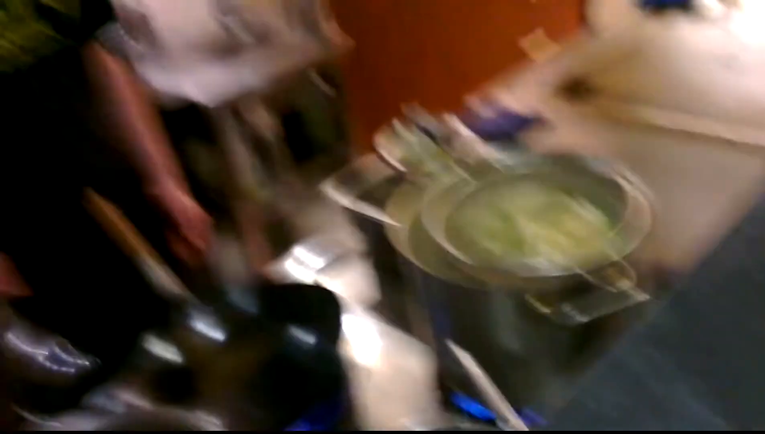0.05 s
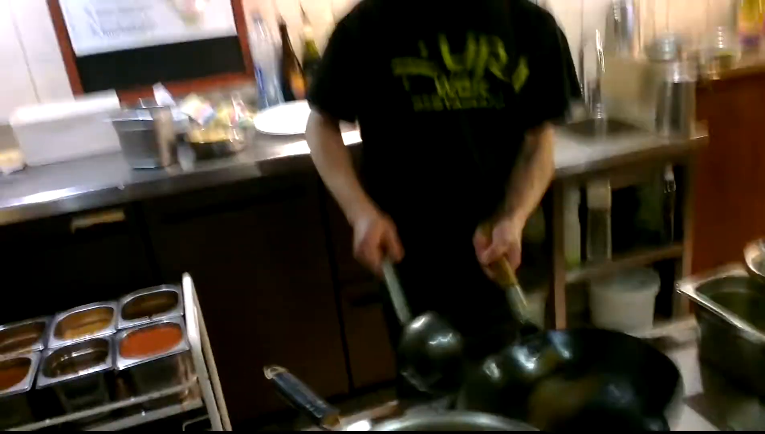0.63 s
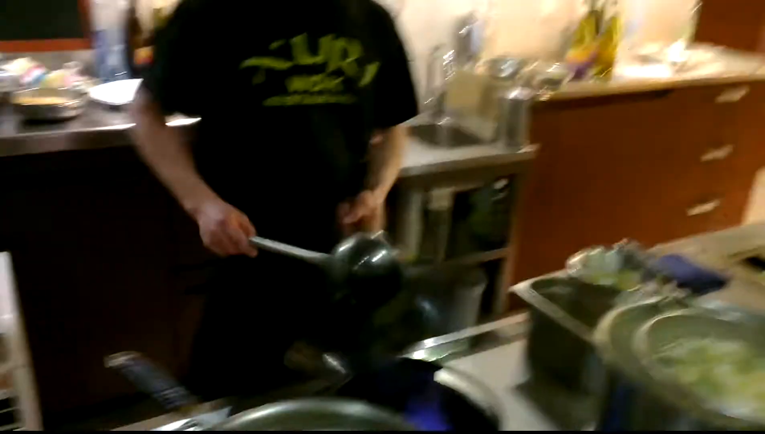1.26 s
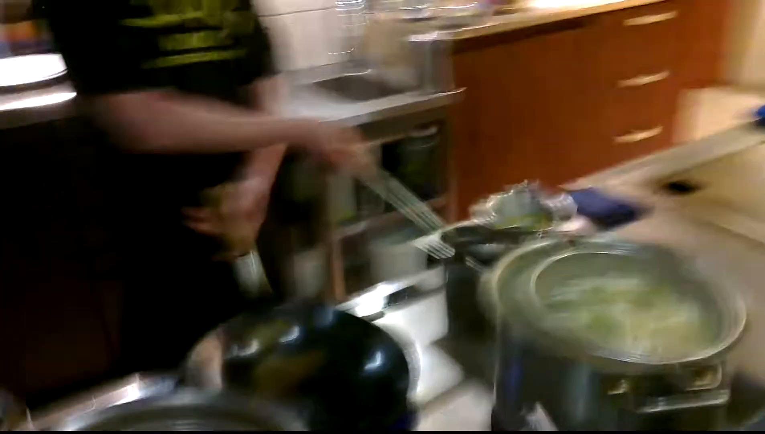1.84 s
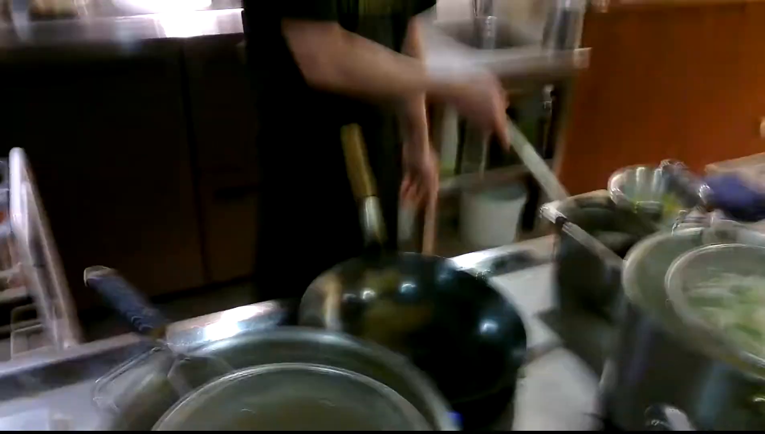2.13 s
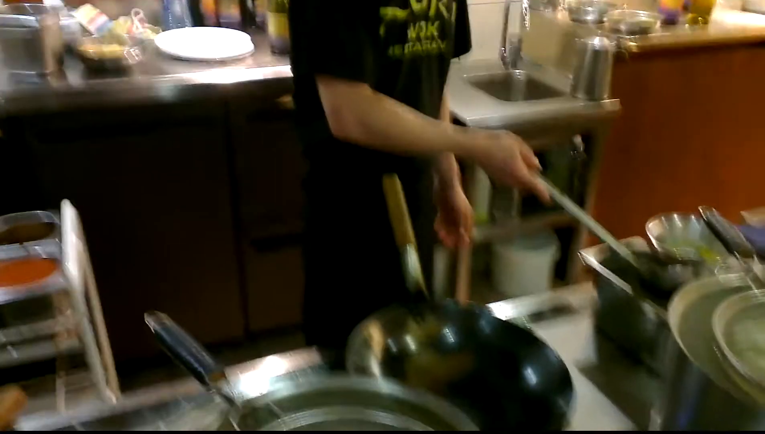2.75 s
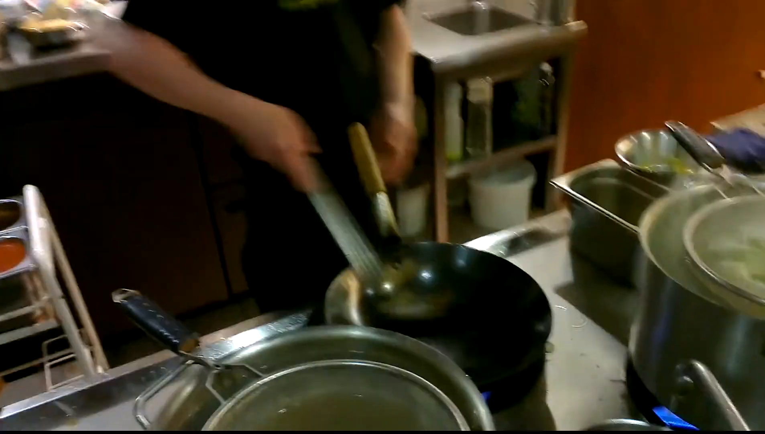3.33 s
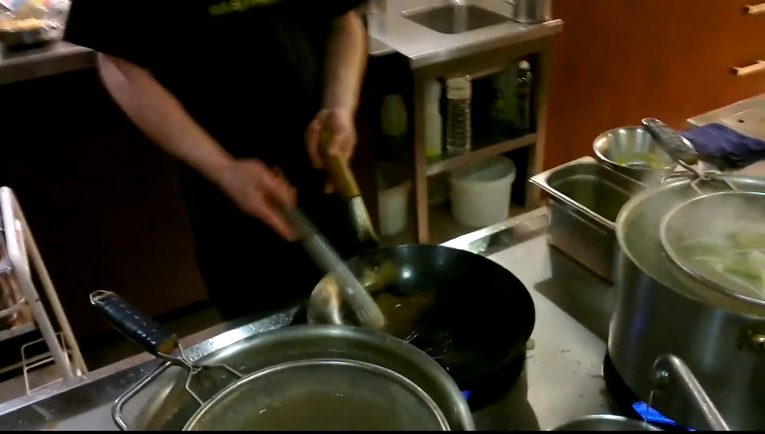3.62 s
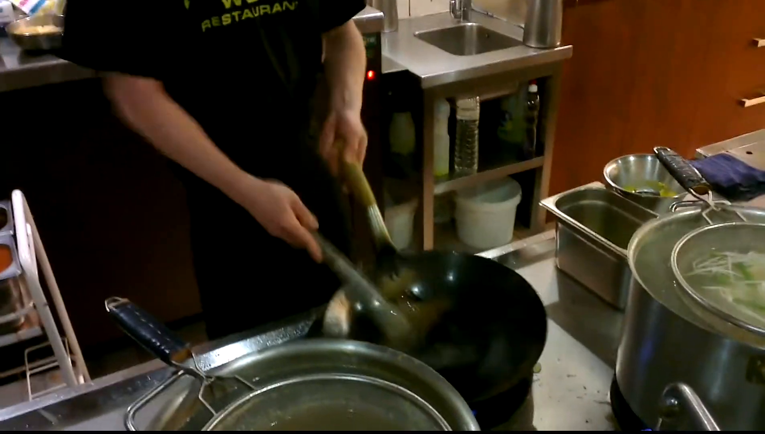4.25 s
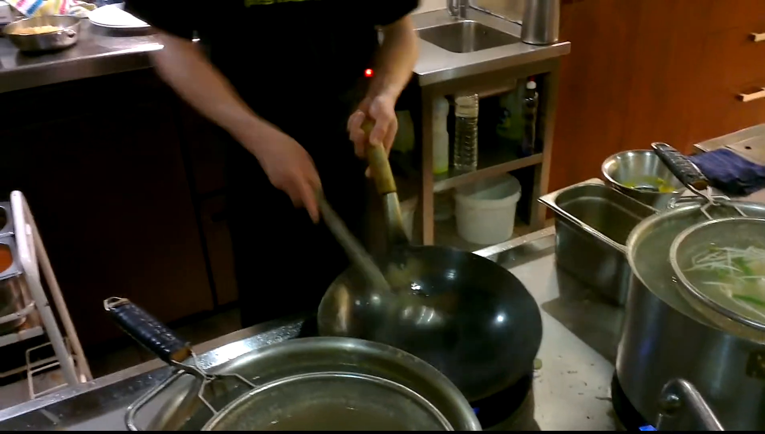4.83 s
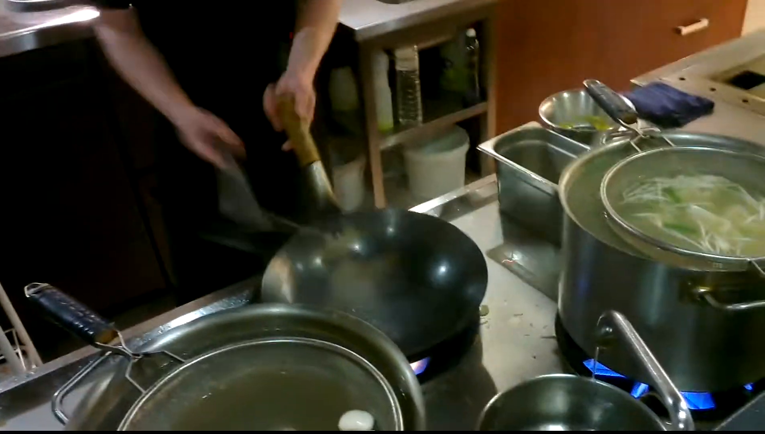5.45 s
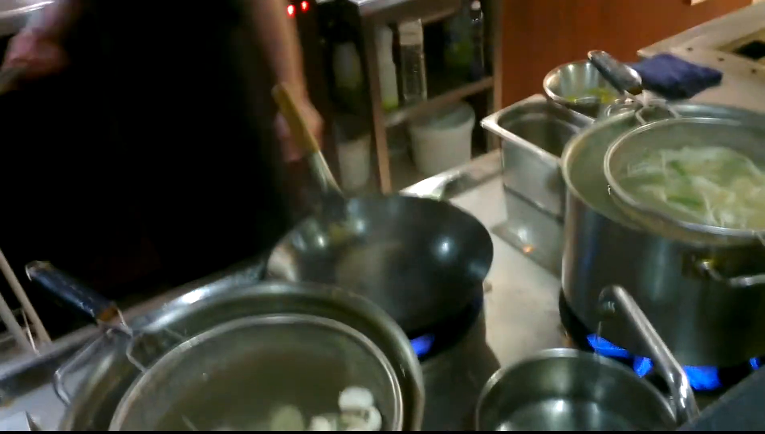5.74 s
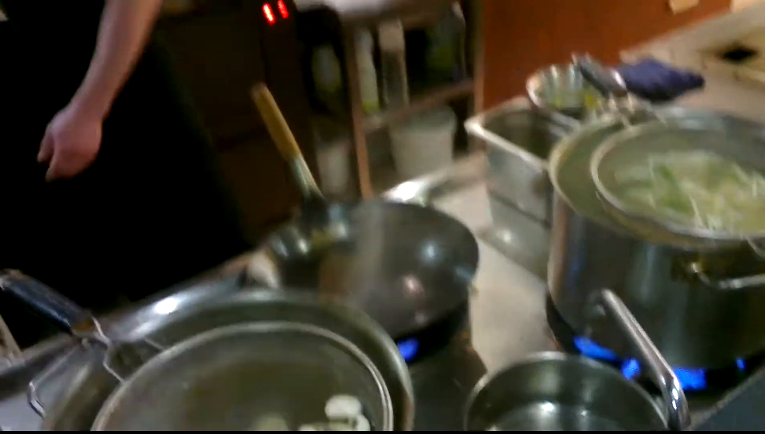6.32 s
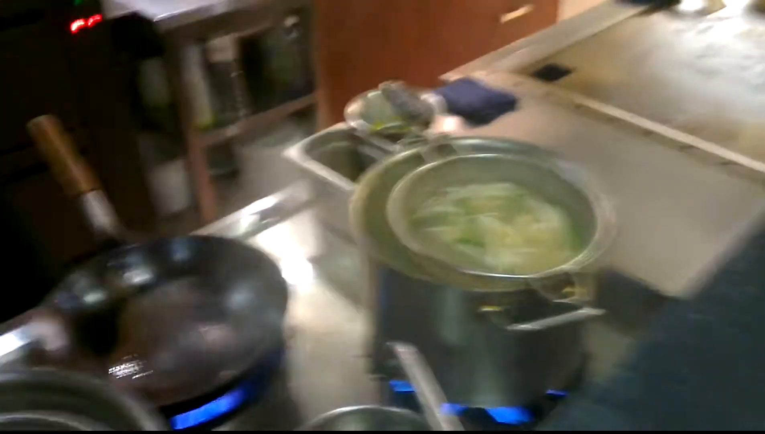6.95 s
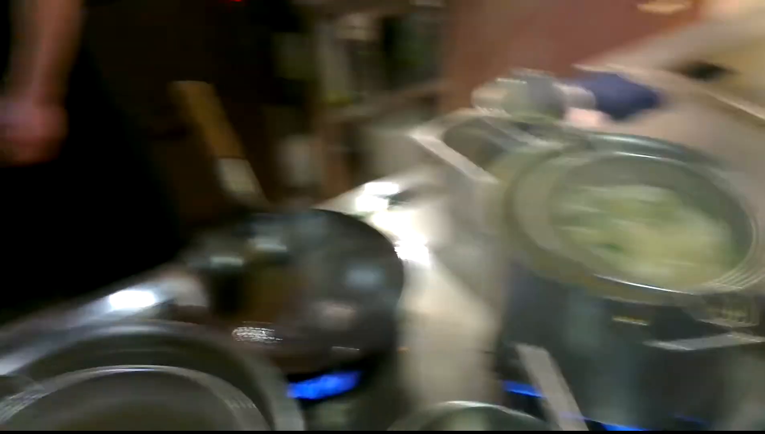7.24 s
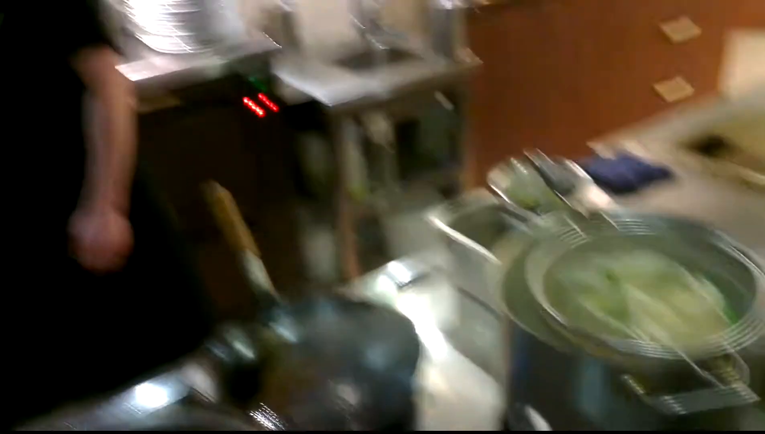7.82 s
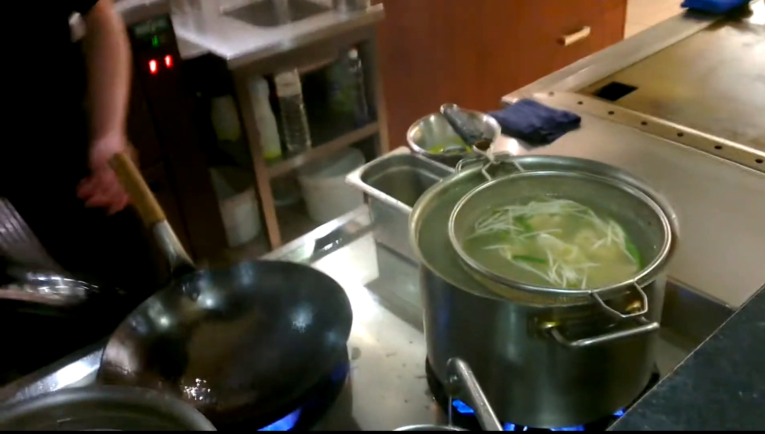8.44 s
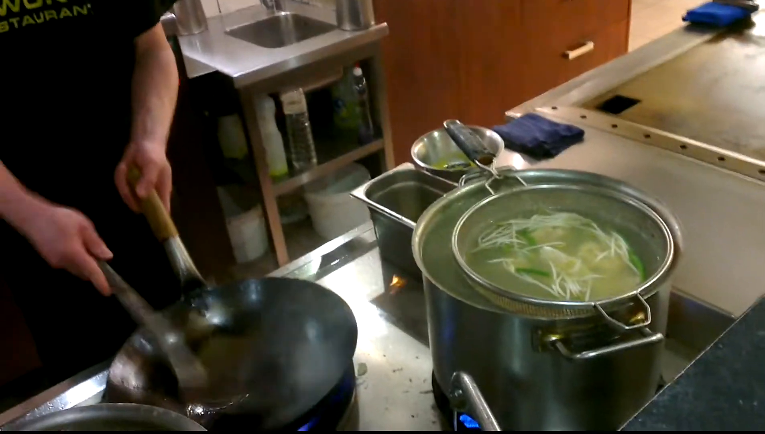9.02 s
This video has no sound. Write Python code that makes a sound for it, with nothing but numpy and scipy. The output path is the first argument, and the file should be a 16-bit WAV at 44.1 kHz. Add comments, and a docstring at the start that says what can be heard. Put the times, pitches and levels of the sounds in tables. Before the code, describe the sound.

A steel wok is struck by a ladle and clatters onto the stove over a roaring gas flame and a hissing hood. After a few seconds, frying starts and swells into a steamy burst, and the flame briefly drops. The ladle clangs and scrapes, oil keeps crackling and popping, and a last clang sets off another burst of sizzling. The microphone is close, in a tiled kitchen.

```python
"""A tiled kitchen, close to the stove, the microphone facing a steel wok on a roaring gas burner. Air hisses
through the hood behind it. The ladle clangs and scrapes, and the wok rattles on its iron ring. Then food meets
the hot oil: bubbles burst, water flashes to steam, fat spits and the sizzle flares twice. The background dips
briefly after each flare. Two short delays widen the sound to stereo."""
import sys
import numpy as np
from scipy import signal
from scipy.fft import rfft, irfft, next_fast_len
from scipy.io import wavfile
from scipy.ndimage import uniform_filter1d, map_coordinates

SR = 44100
rng = np.random.default_rng(int(sys.argv[2]) if len(sys.argv) > 2 else 0)


def transcribe(signal):
    """Save signal, clipped to [-1, 1], as a 16-bit WAV file at the path in sys.argv[1]."""
    frames = np.atleast_2d(signal).T
    limited = np.clip(frames, -1, 1)
    pcm = np.round(limited * 32767).astype(np.int16)
    wavfile.write(sys.argv[1], SR, pcm)


N = 404397

# decay of the kitchen: f/Hz, t60/s
ROOM_DECAY = [(200, 1), (2000, 0.26), (10000, 0.12)]
# level shared by burner and hood, sinking after each flare: t/s, level/dB
ROAR_LEVEL = [(0, -26), (1.65, -26.5), (2.1, -27), (3.3, -27), (4.3, -27), (4.505, -32.5), (4.535, -44.5),
              (4.9, -40.5), (5.08, -34.5), (5.4, -35), (5.53, -26.5), (5.85, -29), (7.3, -29), (8.7, -26.5),
              (8.82, -34), (9.17, -46)]
# spectra of the background: f/Hz, relative level/dB
HOOD_SPECTRUM = [(1060, -11.5), (1800, 0.5), (2770, 1), (3640, 1), (4530, 1), (8830, 0), (9950, 1.5),
                 (14200, -23.5), (15600, -61), (16000, -75)]
FLAME_SPECTRUM = [(40, -58), (60, -60), (115, -16.5), (210, -6.5), (255, -7), (336, -0.5), (421, -4.5),
                  (536, -14.5), (660, -10), (1110, -15), (1710, -18.5), (2100, -27.5), (3200, -54),
                  (5500, -90)]
# resonances of the hollow under the wok: f/Hz, width/Hz, relative level/dB
HOLLOW_MODES = [(212, 22, -1.5), (332, 55.6, 1), (390, 66, -6), (541.5, 36, -7), (606, 53, -11),
                (744, 72, -17), (1047, 31, -14.5), (1886, 27, -14.5)]
# two higher resonances of the flame: f/Hz, width/Hz
FLAME_RESONANCES = [(510, 135), (725, 207)]
# their changing strength against the roar level: t/s, lower note/dB, upper note/dB
FLAME_NOTE_LEVELS = [(0, -8, -27), (.65, -6.5, -19), (1, -14.5, -13), (3, -10, -16), (5.6, -13.5, -13),
                     (6.7, -15, -8), (7.2, -16, -17), (8, -9, -24), (9.17, -9.5, -20)]

# the ladle drags over the steel: t/s, hold/s, f/Hz, level/dB
LADLE_SCRAPES = [(3.524, 0.04, 2880, -36.5), (5.145, 0.011, 3900, -27)]
# the wok lands on its iron ring: t/s, level/dB, dullness/(dB per octave)
WOK_LANDINGS = [(1.403, -22.5, 1), (1.572, -36, 5), (5.572, -29, 11)]
# steel strikes steel: t/s, chatter/s, spot (0 outside the wok, 1 inside),
# wok modes/dB, sheet/dB, rim/dB, iron ring/dB, ladle edge/dB, ladle modes/dB, clack/dB
METAL_BLOWS = [(.38, 0.013, 0, -48, -45, -39, -28, -52, -55, -45),
               (.948, 0.0083, 0, -22, -15, -40, -42, -19, -34, -14.5),
               (.956, 0.026, 0, -14, -16, -27, -42, -15.5, -36, -29),
               (1.078, 0.014, 0, -37, -31, -44, -43, -34.5, -50, -55),
               (1.402, 0.031, 0, -25, -16.5, -40, -23, -22.5, -45, -18),
               (1.426, 0.0042, 0, -36, -20, -38, -21, -30, -50, -25),
               (1.444, 0.005, 0, -34, -24, -36, -25, -31, -50, -17),
               (1.571, 0.0045, .8, -37, -35, -33, -27, -50, -62, -27),
               (1.6, 0.13, 0.82, -44, -37.5, -37, -27, -47, -62, -45),
               (3.386, 0.0074, 0, -48, -30, -33, -28, -24, -32, -28),
               (3.397, 0.0079, 0, -44, -34, -39, -38, -28, -25, -40),
               (4.04, 0.043, 1, -46, -46, -30, -45, -42, -43, -55),
               (5.088, 0.027, 0.79, -22.5, -21.5, -22.5, -28.5, -20, -43, -16.5),
               (5.269, 0.013, 1, -34, -39, -24, -30.5, -30, -57, -20.5),
               (5.568, 0.011, 1, -56, -54, -50, -31, -44, -58, -33),
               (8.651, 0.017, 1, -30, -41, -19, -32, -18, -38, -45)]
# clear modes of the wok: f/Hz, level struck outside/dB, level struck inside/dB, t60/s
WOK_MODES = [(1156, -12, -5, .11), (1495, -3, -12, .08), (1560, -4, -10, .12), (2730, -15, -7, .35),
             (3030, -7, -10, .27), (3860, -5, 2, .26), (4067, -4, -8, .22), (4280, -3, 0, .2),
             (4360, 3, -1, .17), (4662, 1, -2, .25), (4807, -9, -2, .19), (4928, -1, -6, .24),
             (5100, -6, 2, .17), (5416, 1, -7, .22), (5474, -1, -12, .2), (5819, -6, -14, .26),
             (6654, -5, -16, .17), (7402, -4, -14, .18), (7780, -3, -14, .22), (9794, -3, -10, .14),
             (10070, -2, -10, .14)]
# clear modes of the ladle and of the wok as it lands: f/Hz, relative level/dB, t60/s
LADLE_MODES = [(2449, -1, .2), (3026, -1.5, .38), (3263, -5, .5), (3467, -6, .35), (4128, -2, .15),
               (4237, 1, .15), (4555, 2.5, .18), (5445, 2, .13), (5809, -7, .25)]
LANDING_MODES = [(275, -1, .13), (347, -2, .4), (613, 2, .22), (1115, -9, .26), (1261, -6, .15),
                 (1926, -8, .18), (2390, -7, .16), (3441, -12, .28), (4186, 1, .21), (4290, -1, .17),
                 (4985, 2.5, .2), (6632, -7, .12)]
# spectra of the metal's crowded modes: f/Hz, relative level/dB
SHEET_SPECTRUM = [(100, -70), (400, -48), (900, -12), (1500, -5), (2200, -12), (3600, -7), (4250, 5.5),
                  (5500, 1.5), (6200, -3), (8500, -4.5), (10000, -25), (15000, -36)]  # the wok's thin wall
RIM_SPECTRUM = [(100, -59), (3000, -11), (3500, -11), (3800, 0.5), (4400, -6), (5000, -5.5), (5600, -28),
                (9000, -44)]  # its rim, which rings longer
IRON_SPECTRUM = [(30, -70), (70, -48), (130, -36), (240, 4), (480, 7), (620, 7), (760, 2.5), (1020, 3.5),
                 (1600, -3.5), (2500, -9), (4000, -22), (5500, -8), (12000, -40)]  # the wok on its ring
EDGE_SPECTRUM = [(2000, -44), (6000, -7), (8500, -1), (9900, 8), (11200, -2.5), (15500, -16)]  # the ladle's hard edge
CLACK_SPECTRUM = [(30, -70), (100, -45), (400, -8), (1000, 2), (1550, 0), (2100, -2), (3000, -21),
                  (6000, -12), (14000, -25)]  # the first touch

# the simmer between surges: t/s, level/dB
SIMMER_LEVEL = [(3.4, -35), (3.55, -36), (3.85, -31.5), (4.05, -24.5), (4.35, -21.5), (4.55, -28),
                (5.0, -25), (5.33, -30), (5.55, -23), (6.35, -24), (6.9, -27.5), (7.35, -28.5),
                (7.6, -27.5), (7.8, -31), (8.6, -32.5), (8.85, -25), (9.17, -31.5)]
# fresh food touches hot steel: t/s, hold/s, sizzle/dB, steam/dB
SIZZLE_SURGES = [(3.488, 0.013, -26, -44), (3.873, .01, -23, -39), (3.967, 0.059, -21.5, -42),
                 (4.118, 0.049, -19.5, -43), (4.2, 0.047, -18, -30), (4.817, 0.04, -42, -29.5),
                 (5.02, 0.024, -24, -28), (5.06, 0.056, -19.5, -40), (5.166, 0.071, -23, -45),
                 (5.361, 0.021, -21.5, -31), (5.433, 0.03, -22, -28), (5.582, .01, -20.5, -40),
                 (5.68, 0.045, -23.5, -28), (5.76, 0.093, -20, -30), (5.987, 0.07, -23, -25),
                 (6.185, 0.058, -20, -24.5), (6.394, 0.055, -21, -36), (6.486, 0.095, -25, -28),
                 (6.722, 0.047, -25, -33), (6.812, .01, -22, -24.5), (7.01, 0.052, -25.5, -30),
                 (7.213, 0.02, -23, -42), (7.27, .005, -40, -25), (7.431, 0.088, -22.5, -25.5),
                 (7.932, .005, -21, -24), (7.995, 0.025, -27, -31), (8.34, 0.016, -30, -32)]
# wet food flares up in the oil: t/s, attack/s, hold/s, t60/s, sizzle/dB, steam/dB, splutter/dB
OIL_FLARES = [(4.17, 0.063, 0.062, 0.62, -21, -20, -23.5), (4.304, 0.19, 0.027, 0.026, -35, -18.5, -37),
              (8.612, 0.046, 0.069, 0.28, -17, -28, -16), (8.69, 0.065, 0.011, 0.27, -21, -17.5, -36),
              (8.755, 0.041, .05, 4.6, -38, -28.5, -28.5)]
# fat spits: t/s, snap peak/dB, spray/dB
FAT_SPITS = [(3.536, -13, -27), (3.893, -24, -28), (4.146, -6, -30), (4.289, -5, -23), (4.477, -7, -24),
             (4.511, -1, -22), (5.054, -7, -30), (5.610, -4, -22), (6.073, -5, -27), (6.088, -5, -32),
             (6.104, -5, -32), (6.188, -14, -27), (6.401, -16, -23), (6.786, -8, -33), (7.068, -5, -30),
             (7.259, -4, -26), (7.314, -5, -28), (7.358, -9, -18), (7.363, -7, -30), (7.454, -4, -26),
             (7.506, -6, -28), (7.528, -7, -28), (7.735, -16, -25), (7.934, -6, -19), (7.937, -2, -17.5),
             (8.154, -18, -32), (8.237, -13, -37), (8.315, -4, -26), (8.355, -9, -20.5), (8.431, -9, -22.5)]
# spectra of the frying: f/Hz, relative level/dB
SIZZLE_SPECTRUM = [(100, -75), (1200, -28), (2300, -20), (2800, -16.5), (5000, -14.5), (8000, -6),
                   (9000, -0.5), (9800, 1), (10500, -3), (11500, -7), (14400, -16.5), (15800, -29)]  # small bursting bubbles
STEAM_SPECTRUM = [(100, -57), (1200, -21.5), (2300, -16.5), (2750, -12), (3800, -10.5), (4800, -6.5),
                  (5600, -3), (7300, 0.5), (8300, -2.5), (9500, -27), (15000, -18.5)]
SPLUTTER_SPECTRUM = [(100, -75), (700, -37), (1500, -11.5), (2600, 0), (3300, 0), (3900, 4.5), (4800, 4.5),
                     (5600, -1.5), (7200, 2), (9000, -11), (15000, -26)]  # water flashing to steam
SNAP_SPECTRUM = [(100, -45), (1200, -12), (3000, -6), (6000, -3), (10000, 0), (13000, -4), (15800, -12)]  # the crack of one drop

# the two delayed copies that make the stereo width: f/Hz, gain/dB
EARLY_COPY_GAIN = [(40, -6), (110, -1), (400, -3.5), (1000, -7), (3000, -7), (9000, -9), (15000, -24)]
LATE_COPY_GAIN = [(800, -40), (2500, -21), (6000, -14), (10000, -7), (15000, -2.5)]


def amp(db):
    """Decibels to gain."""
    return 10 ** (np.asarray(db) / 20)


def unit(x):
    """x at rms 1."""
    return x / np.sqrt(np.mean(x ** 2) + 1e-20)


def along(points, hz):
    """Read (f/Hz, value) points on a log frequency axis."""
    f, values = np.transpose(points)
    return np.interp(np.log(hz + 1), np.log(f + 1), values)


def curves(rows):
    """One value per sample for each column after the time."""
    times, *columns = np.transpose(rows)
    return [np.interp(np.arange(N) / SR, times, column) for column in columns]


def wobble(rate):
    """A smooth random curve, rate knots a second."""
    knots = rng.standard_normal(int(N * rate / SR) + 4)
    return map_coordinates(knots, [np.arange(N) * rate / SR])


def swell(start, attack, hold, t60):
    """An envelope that rises smoothly, holds and dies away."""
    t = np.arange(N) / SR - start
    rise = np.sin(np.pi / 2 * np.clip(t / attack, 0, 1)) ** 2
    return rise * amp(-60 * np.clip((t - attack - hold) / t60, 0, 2))


def filtered(x, response):
    """x through a complex frequency response."""
    size = next_fast_len(len(x) + SR // 4)
    return irfft(rfft(x, size) * response(np.fft.rfftfreq(size, 1 / SR)), size)[:len(x)]


def coloured(x, spectrum):
    """x shaped by a spectrum, at rms 1."""
    return unit(filtered(x, lambda hz: amp(along(spectrum, hz))))


def resonances(modes, f):
    """Causal response of (f/Hz, width/Hz, level/dB) resonances, alternating in sign."""
    return sum((-1) ** k * amp(db) * 1j * f * width / (hz * hz - f * f + 1j * f * width)
               for k, (hz, width, db) in enumerate(modes))


def narrow_band(x, hz, width_hz):
    """x passed twice through one resonance, at rms 1."""
    return unit(filtered(x, lambda f: resonances([(hz, width_hz, 0)], f) ** 2))


def grains(size, rate, spread_db):
    """Random clicks, rate a second; spread_db makes a few larger than the rest."""
    fires = rng.random(size) < rate / SR
    strength = amp(spread_db * np.minimum(rng.exponential(size=size), 6))
    sign = np.sign(rng.standard_normal(size))
    return unit(fires * sign * strength)


def add(track, start, sound):
    """Mix a sound into the track at start seconds."""
    part = track[max(round(start * SR), 0):][:len(sound)]
    part += sound[:len(part)]


def kitchen_reverb(x):
    """Tiles and steel around the stove answer with a short tail."""
    hz, t, spectra = signal.stft(rng.standard_normal(SR // 2), SR, nperseg=256)
    decay = amp(-60 * t / along(ROOM_DECAY, hz)[:, None])
    tail = signal.istft(spectra * decay, SR, nperseg=256)[1]
    delayed_tail = np.pad(tail, (SR // 150, 0)) / np.linalg.norm(tail)
    return signal.fftconvolve(x, delayed_tail)[:N]


def hood(hiss_db=-9.0, diffuse_db=-9):
    """Air rushes through the hood, partly different left and right; it sinks with the roar."""
    roar_db, = curves(ROAR_LEVEL)
    mid, side = (coloured(rng.standard_normal(N), HOOD_SPECTRUM) for _ in range(2))
    return amp(roar_db + hiss_db) * (mid + amp(diffuse_db) * np.array([side, -side]))


def burner(hum_db=-6, flame_db=-5.0, flutter_db=1):
    """The turbulent flame roars, sings on two notes and stirs the hollow under the wok."""
    roar_db, = curves(ROAR_LEVEL)
    flame = coloured(rng.standard_normal(N), FLAME_SPECTRUM)
    hollow = lambda f: resonances(HOLLOW_MODES, f) * f ** 2 / (f ** 2 + 150 ** 2)
    hum = unit(filtered(rng.standard_normal(N), hollow))
    song = sum(amp(note_db) * narrow_band(rng.standard_normal(N), hz, width)
               for (hz, width), note_db in zip(FLAME_RESONANCES, curves(FLAME_NOTE_LEVELS)))
    return amp(roar_db + flutter_db * wobble(18)) * (amp(flame_db) * flame + amp(hum_db) * hum + song)


def ladle_scrapes(width_hz=1400, attack=.008, t60=0.089):
    """The ladle sticks and slips along the steel; the slips excite a band that depends on the spot."""
    track = np.zeros(N)
    for start, hold, hz, db in LADLE_SCRAPES:
        slips = grains(N, rate=2300, spread_db=1.5)
        track += amp(db) * swell(start, attack, hold, t60) * narrow_band(slips, hz, width_hz)
    return track


def ringing(modes, pressure, t, scatter_db=1.5, contact_blur=.02):
    """Modes store the energy of the contacts and let it die away; while touched, their phases wander."""
    sound = np.zeros(len(t))
    for hz, db, t60 in modes:
        energy = np.abs(signal.fftconvolve(pressure ** 2, amp(-120 * t / t60))[:len(t)])
        wander = contact_blur * np.cumsum(pressure * rng.standard_normal(len(t)))
        envelope = amp(db + rng.normal(0, scatter_db)) * np.sqrt(energy / energy.max())
        sound += envelope * np.sin(2 * np.pi * (hz * t + rng.random()) + wander)
    return sound


def wok_landings(chatter_t60=0.18, hollow_hz=620):
    """The wok rocks briefly on its ring; a soft landing wakes mainly the modes near the hollow note."""
    track, t = np.zeros(N), np.arange(SR // 2) / SR
    pressure = amp(-60 * t / chatter_t60)
    for start, db, dull_db in WOK_LANDINGS:
        modes = [(hz, mode_db - dull_db * abs(np.log2(hz / hollow_hz)), t60)
                 for hz, mode_db, t60 in LANDING_MODES]
        add(track, start, amp(db) * ringing(modes, pressure, t))
    return track


def metal_blows(stop_t60=0.053, first_touch=12):
    """Steel clacks, then chatters on steel; every contact rings the wok, its iron ring and the ladle."""
    track, t = np.zeros(N), np.arange(SR // 2) / SR
    for start, chatter, spot, *levels_db in METAL_BLOWS:
        modes_db, sheet_db, rim_db, iron_db, edge_db, ladle_db, clack_db = levels_db
        pressure = amp(-6 * t / chatter - 60 * np.maximum(t - chatter, 0) / stop_t60)
        contacts = grains(len(t), rate=1200, spread_db=2.5) * pressure
        contacts[0] = pressure[0] = first_touch  # the hardest contact
        unit_onset = lambda sound: sound / np.std(sound[:int((chatter + .02) * SR)])
        # clear modes ring as tones, crowded ones as decaying noise
        clear = lambda modes: unit_onset(ringing(modes, pressure, t))
        body = lambda spectrum, t60: coloured(rng.standard_normal(len(t)), spectrum) * amp(-60 * t / t60)

        def crowded(spectrum, t60):
            return unit_onset(signal.fftconvolve(contacts, body(spectrum, t60))[:len(t)])

        struck = [(hz, np.interp(spot, [0, 1], [outside_db, inside_db]), t60)
                  for hz, outside_db, inside_db, t60 in WOK_MODES]
        wok = amp(modes_db) * clear(struck) + amp(sheet_db) * crowded(SHEET_SPECTRUM, t60=0.23)
        rim = amp(rim_db) * crowded(RIM_SPECTRUM, t60=0.45)
        iron = amp(iron_db) * crowded(IRON_SPECTRUM, t60=0.31)
        ladle = amp(edge_db) * crowded(EDGE_SPECTRUM, t60=0.14) + amp(ladle_db) * clear(LADLE_MODES)
        clack = amp(clack_db) * body(CLACK_SPECTRUM, t60=.075)
        add(track, start, wok + rim + iron + ladle + clack)
    return track


def fat_spits(spray_t60=0.11, steam_db=-7, splutter_db=-17):
    """A drop bursts with one sharp snap and throws a spray of fat, steam and water that fizzles out."""
    track, t = np.zeros(N), np.arange(SR // 3) / SR
    snap = coloured(signal.unit_impulse(len(t), 20), SNAP_SPECTRUM)
    snap /= np.abs(snap).max()
    for start, snap_db, spray_db in FAT_SPITS:
        droplets = grains(len(t), rate=9000, spread_db=0.8)
        spray = unit(coloured(droplets, SIZZLE_SPECTRUM)
                     + amp(steam_db) * coloured(droplets, STEAM_SPECTRUM)
                     + amp(splutter_db) * coloured(droplets, SPLUTTER_SPECTRUM))
        add(track, start, amp(snap_db) * snap + amp(spray_db - 60 * t / spray_t60) * spray)
    return track


def clumped(x, depth_db=1.34):
    """Bubbles come in clumps of like size: each band swells and fades by itself."""
    spectra = signal.stft(x, nperseg=256)[2]
    across_bands = uniform_filter1d(rng.standard_normal(spectra.shape), size=5, axis=0)
    clumps = unit(uniform_filter1d(across_bands, size=8, axis=1))
    return unit(signal.istft(spectra * amp(depth_db * clumps), nperseg=256)[1][:len(x)])


def frying_envelopes(steam_db=-3, splutter_db=-16, seethe_db=0.5, full_roar_db=-27):
    """Simmer, surges and flares add in power; one row each for sizzle, steam and splutter."""
    simmer_db, = curves(SIMMER_LEVEL)
    roar_db, = curves(ROAR_LEVEL)
    food_in = np.arange(N) / SR > SIMMER_LEVEL[0][0]
    simmer = amp(simmer_db + seethe_db * wobble(18)) * food_in
    powers = lambda envelope, levels_db: np.outer(amp(levels_db), envelope) ** 2
    power = powers(simmer, [0, steam_db, splutter_db])
    power[2] *= amp(roar_db - full_roar_db) ** 2  # the simmer's splutter sinks with the roar
    for start, hold, *levels_db in SIZZLE_SURGES:
        power[:2] += powers(swell(start, attack=0.02, hold=hold, t60=0.34), levels_db)
    for start, attack, hold, t60, *levels_db in OIL_FLARES:
        power += powers(swell(start, attack, hold, t60), levels_db)
    return np.sqrt(power)


def frying(flicker_db=1.0, crackle_rise_db_per_s=2.4, fizz_db=-36.5, fizz_fall_db_per_s=16):
    """Countless bubbles burst in the oil, some with a crackle; water adds steam and a coarse splutter."""
    t = np.arange(N) / SR
    envelopes = frying_envelopes()
    sizzle = coloured(grains(N, rate=9000, spread_db=0.0), SIZZLE_SPECTRUM)
    cooking_s = t - SIMMER_LEVEL[0][0]
    crackle_db = np.minimum(-16 + crackle_rise_db_per_s * cooking_s, -8.5)  # drier food crackles more
    crackle = amp(crackle_db) * coloured(grains(N, rate=140, spread_db=1.1), SIZZLE_SPECTRUM)
    steam = coloured(grains(N, rate=9000, spread_db=1.5), STEAM_SPECTRUM)
    splutter = coloured(grains(N, rate=3000, spread_db=1.0), SPLUTTER_SPECTRUM)
    food = (envelopes * [clumped(sizzle + crackle), clumped(steam), clumped(splutter)]).sum(axis=0)
    fizz = amp(fizz_db - fizz_fall_db_per_s * t) * sizzle  # the empty wok dries at the start
    return food * amp(flicker_db * wobble(60)) + fizz


def scene(metal_room_db=-12, oil_room_db=-9):
    """The stove is close and straight ahead of the microphone; the room differs left and right."""
    metal = metal_blows() + wok_landings() + ladle_scrapes()
    oil = frying() + fat_spits()
    background = burner() + hood()
    into_room = amp(metal_room_db) * metal + amp(oil_room_db) * oil
    room = np.array([kitchen_reverb(into_room), kitchen_reverb(into_room)])
    return room + background + metal + oil


def record(dry, low_cut_hz=75, top_hz=15800, early_s=.001621, late_s=.00403):
    """Two delayed copies, opposite left and right, add width; peaks are rounded, lows and top are cut."""
    delayed = lambda hz, gain, delay: amp(along(gain, hz)) * np.exp(-2j * np.pi * hz * delay)
    copies = lambda hz: delayed(hz, EARLY_COPY_GAIN, early_s) - delayed(hz, LATE_COPY_GAIN, late_s)
    side = filtered(dry.mean(axis=0), copies)
    wide = dry + np.array([side, -side])
    rounded = wide / (1 + wide ** 6) ** (1 / 6)
    passband = lambda hz: (hz < top_hz) * hz ** 2 / np.hypot(hz ** 2, low_cut_hz ** 2)
    return np.array([filtered(channel, passband) for channel in rounded])


dry = scene()
out = record(dry)
transcribe(out)
```